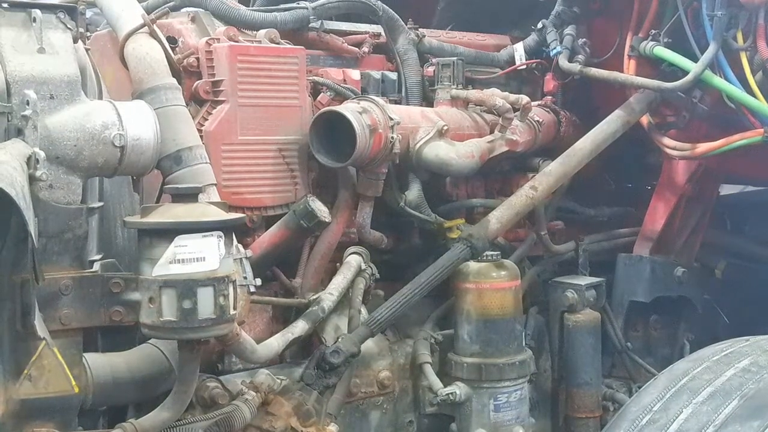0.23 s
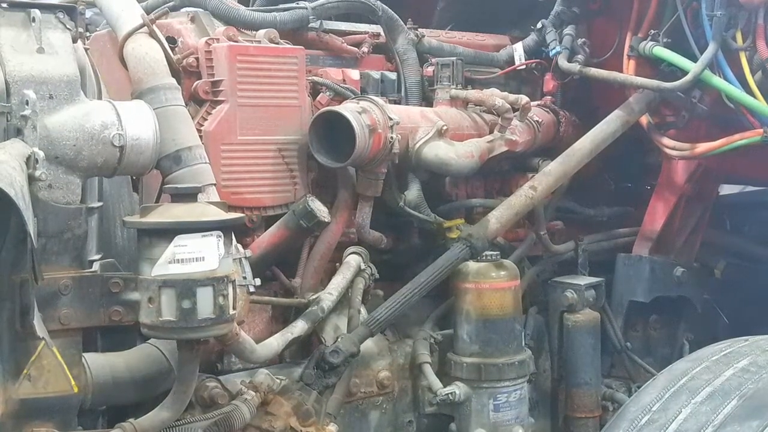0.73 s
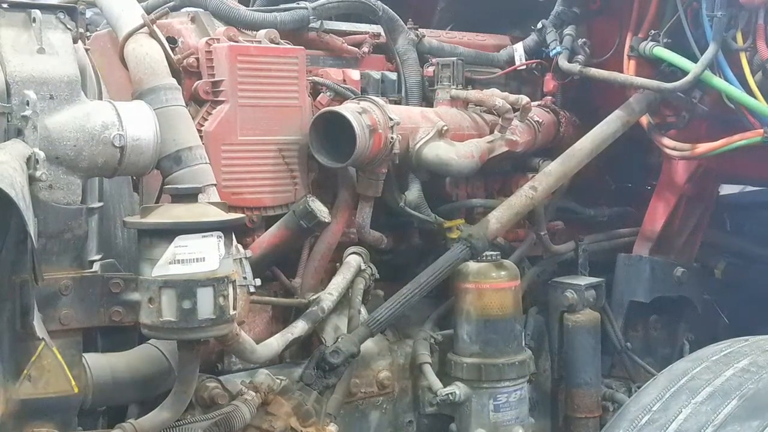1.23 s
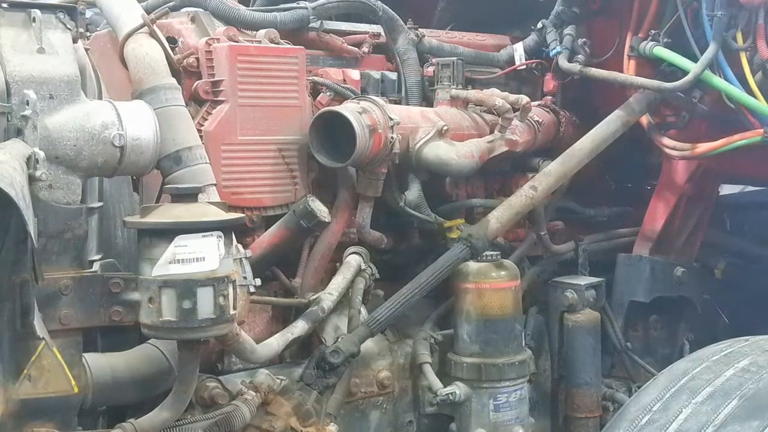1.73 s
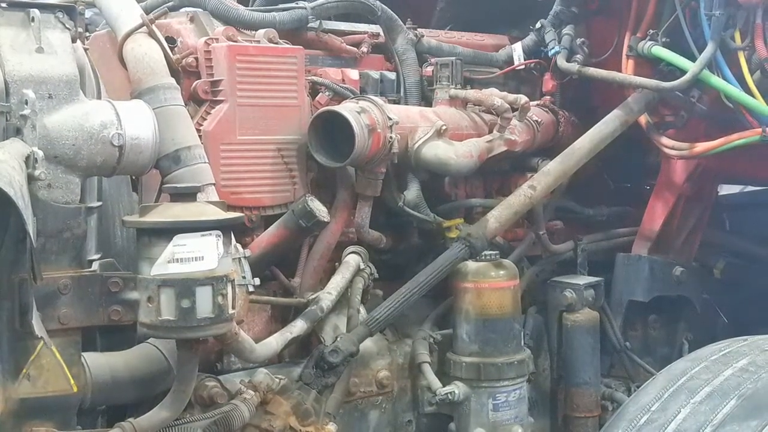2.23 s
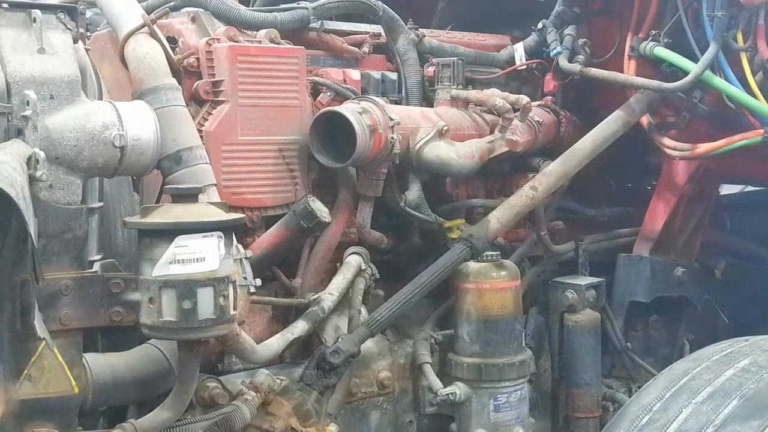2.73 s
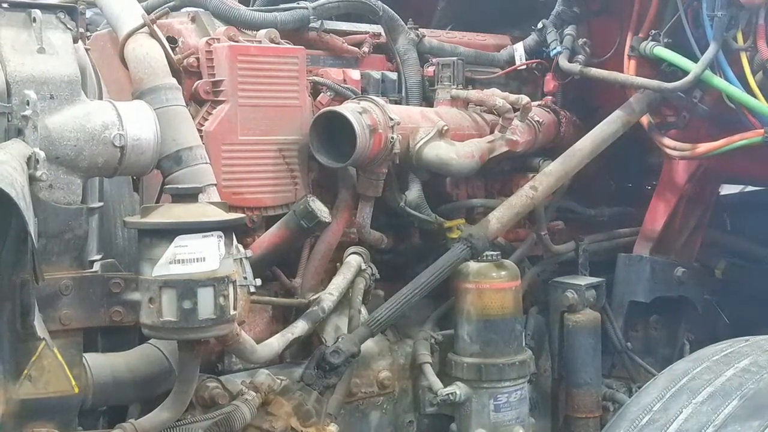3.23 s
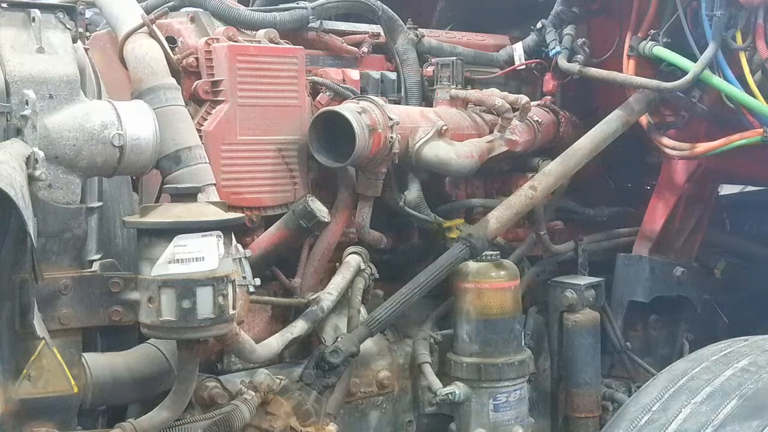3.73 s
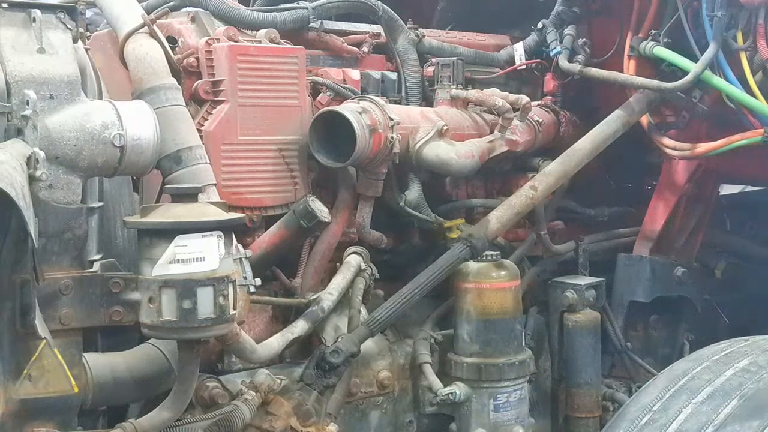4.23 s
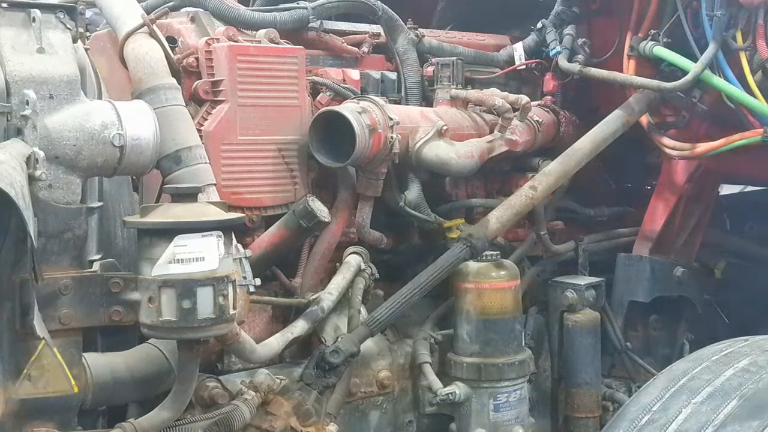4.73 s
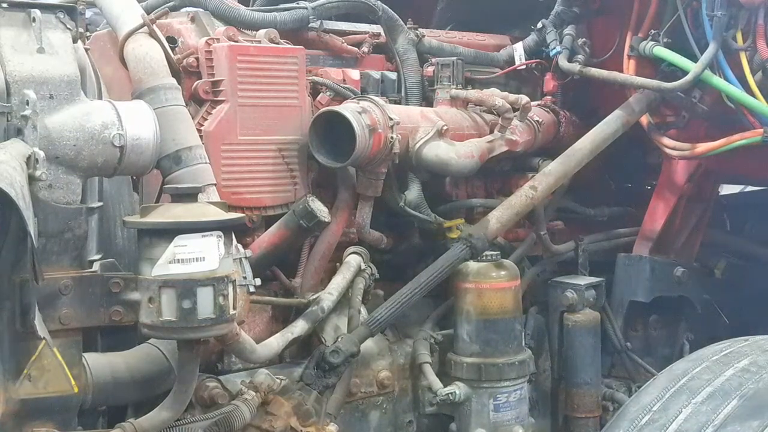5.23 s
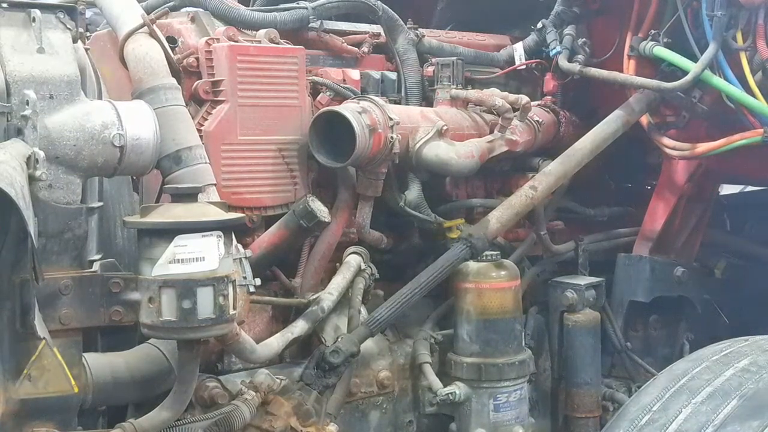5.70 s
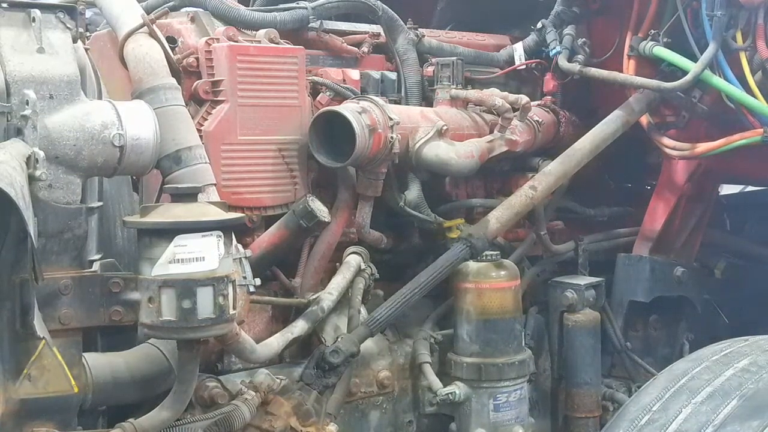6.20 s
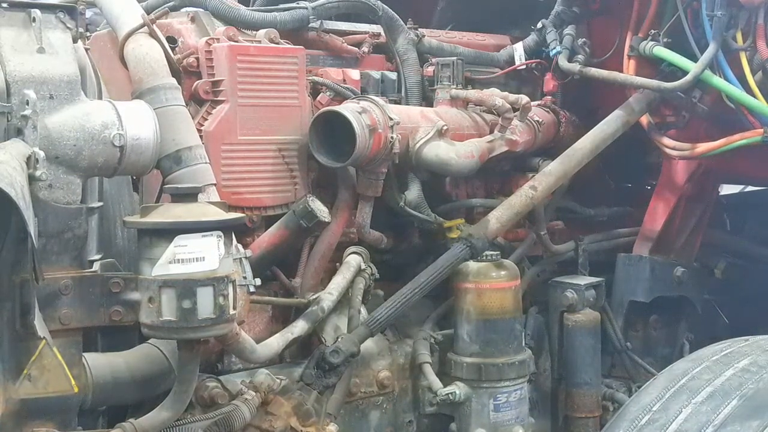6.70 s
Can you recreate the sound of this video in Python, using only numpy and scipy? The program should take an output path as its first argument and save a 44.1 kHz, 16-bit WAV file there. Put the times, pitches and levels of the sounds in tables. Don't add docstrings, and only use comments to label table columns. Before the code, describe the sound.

A big diesel engine roars at high revs up close, drops, blips once, coasts down, and settles into a lumpy, clattering idle.

```python
import sys
import numpy as np
from scipy import signal
from scipy.fft import rfft, irfft, next_fast_len
from scipy.io import wavfile
from scipy.ndimage import uniform_filter1d

SR = 44100
rng = np.random.default_rng(int(sys.argv[2]) if len(sys.argv) > 2 else 0)


def boost_factor(decibels):
    exponent = np.asarray(decibels, float) / 20
    return 10 ** exponent


def transcribe(u):
    v = np.clip(np.atleast_2d(u).T, -1, 1)
    q = np.round(v * 32767).astype(np.int16)
    wavfile.write(sys.argv[1], SR, q)


N = 306936


def evened(x):
    return x / np.sqrt(np.mean(x ** 2) + 1e-20)


def read(points, hz):
    f, value = np.transpose(points)
    return np.interp(np.log(hz + 1), np.log(f + 1), value)


def curves(rows):
    s, *columns = np.transpose(rows)
    return [np.interp(np.arange(N) / SR, s, c) for c in columns]


def colour(x, points):
    edge = 2048
    x = np.concatenate([x[..., edge:0:-1], x, x[..., :-edge - 1:-1]], axis=-1)
    size = next_fast_len(x.shape[-1])
    gain = boost_factor(read(points, np.fft.rfftfreq(size, 1 / SR)))
    return irfft(rfft(x, size) * gain, size)[..., edge:edge + N]


def resonate(x, hz, width):
    turn = np.exp(2j * np.pi * np.cumsum(hz * np.ones(len(x))) / SR)
    r = np.exp(-np.pi * width / SR)
    return 2 * (turn * signal.lfilter([1 - r], [1, -r], x / turn)).real


def resonate_twice(x, hz, width):
    return resonate(resonate(x, hz, width), hz, width)


def drift(hz, count):
    steps = rng.standard_normal((count, N // 256 + 2))
    steps = signal.filtfilt(*signal.butter(2, hz, fs=SR / 256), steps)
    return np.array([np.interp(np.arange(N) / 256, np.arange(len(s)), evened(s)) for s in steps])


# t/s, firing rate f/Hz
SPEED = [(0, 75.0), (.9, 75.2), (1.15, 67.2), (1.5, 57.0), (1.81, 48.7), (2.0, 62.5), (2.09, 72.0),
         (2.19, 77.9), (2.25, 76.7), (2.6, 64.8), (3.1, 51.2), (3.59, 39.7), (3.82, 34.0), (4.02, 32.5),
         (4.3, 32.5), (5.2, 30.9), (6.1, 30.4), (6.96, 30.1)]


def crank_speed():
    return curves(SPEED)[0]


STAGE_BLEND_S = .05
# from t/s, throb level/dB, its octave level/dB, fuel level/dB, knock depth [0-1],
# pipe notes level/dB
STAGES = [
    (0, -15, -22, 0.5, 0.15, 0),
    (.92, -14.5, -20, -0.5, .2, 1),
    (1.84, -12.5, -25, 0.5, .15, -7),
    (2.04, -29, -22, 1, 0.2, -6),
    (2.2, -14, -21, -0.5, .1, -1),
    (2.62, -13, -21, -0.5, .12, 0),
    (2.95, -13, -21, -0.5, .15, -1.5),
    (3.639, -19.5, -27, 0.7, .27, -1),
    (4.101, -18, -34.5, 1.3, 0.33, -1),
    (5.1, -17.2, -35, 0.5, 0.36, 0),
]


def pedal():
    s, *columns = np.transpose(STAGES)
    which = np.searchsorted(s, np.arange(N) / SR, side="right") - 1
    return [uniform_filter1d(c[np.maximum(which, 0)], size=round(STAGE_BLEND_S * SR)) for c in columns]


CRANK = [-26, -18, -40, -14, -21, -40, -13, -16, -9, -10, -11, -18, -13, -9, -18, -12, -14, -18, -18, -18,
         -14, -17, -13, -22, -20, -16, -20, -17, -17, -17, -16, -24, -24, -18, -16, -18]
# f/Hz, level/dB
PIPE = [(30, -14), (62, -10), (76, -1), (90, 4), (101, -9), (132, -7), (155, -15), (176, -7), (194, -14),
        (212, -1), (228, -1), (250, -2), (290, 1), (325, 2), (352, -3), (420, -12), (600, -2), (900, -10)]
# f/Hz, level/dB
OCTAVE_PIPE = [(70, 0), (92, 2), (103, -6), (116, -6), (128, 2), (140, 0), (150, -5)]


def exhaust(firings, hz, throb_db, octave_db, gas_db):
    wobble_db = 1.0 * drift(4.0, count=len(CRANK))
    out = boost_factor(throb_db - 0.5) * np.sqrt(2) * np.cos(2 * np.pi * firings)
    octave = np.cos(2 * np.pi * (2 * firings + 0.27))
    out += boost_factor(octave_db + read(OCTAVE_PIPE, 2 * hz)) * np.sqrt(2) * octave
    for k, db in enumerate(CRANK):
        order = (k + 1) / 3
        level = boost_factor(db + 4.8 + gas_db + read(PIPE, order * hz) + wobble_db[k])
        out += level * np.cos(2 * np.pi * (order * firings + rng.random()))
    return out


# t/s, length t/s, pipe note f/Hz, level/dB
BARKS = [
    (1.82, .3, 120, -14.5),
    (1.92, .32, 140, -15.5),
    (1.86, .32, 300, -16.5),
    (4.04, .2, 100, -21),
]


def barks(firings):
    which = firings.astype(int)
    pulses = boost_factor(3.0 * rng.standard_normal(1000)[which]) * np.diff(which, prepend=which[0])
    pulses = evened(pulses) + 1.5 * rng.standard_normal(N)
    out = np.zeros(N)
    for s, length, hz, db in BARKS:
        at, span = round(s * SR), round(length * SR)
        note = resonate_twice(pulses, hz, 70)[at:at + span]
        out[at:at + span] += boost_factor(db) * evened(note) * signal.windows.tukey(span, .5)
    return out


# f/Hz, level/dB
RUMBLE = [(15, -12.5), (45, -5), (70, -2), (95, 0), (125, 0.5), (165, -12.5), (230, -0.5), (310, -9.5),
          (400, -12.5), (520, -10), (800, -40.5)]


def rumble(beat, gas_db, firings, depth):
    lumps = 1 + .8 * depth * np.cos(2 * np.pi * (firings / 3 + .3))
    gas = lumps * (1.3 + 0.12 * beat) * rng.standard_normal(N)
    return boost_factor(.55 * gas_db - 11.5) * evened(colour(gas, RUMBLE))


CYLINDER_DB = [2, 1.5, -.8, 1.3, .8, -.8]


def knocks(firings, depth, lag=.45, sharp=2.3, uneven_db=.4):
    stroke = firings - lag + 6
    which = stroke.astype(int)
    size = boost_factor(np.take(CYLINDER_DB, which % 6) + uneven_db * rng.standard_normal(1000)[which])
    burst = uniform_filter1d(size * np.exp(-sharp * (stroke % 1)), size=220)
    depth = np.clip(depth, 0, 1)
    blows = depth * size * np.diff(which, prepend=which[0])
    beat = 1 - depth + depth * burst / burst.mean()
    return beat, blows


# f/Hz, level/dB
CLATTER = [(210, -29), (350, -10.5), (501, -6), (650, -5), (764, -0.5), (865, -3), (1250, -8.5), (1390, -8),
           (1730, -12.5), (2270, -19), (3510, -29.5), (4330, -25.5), (6770, -61), (8800, -94),
           (14900, -120)]
# f/Hz, width f/Hz, level/dB
BLOCK = [(606.8, 54.4, -11.5), (655.5, 60, -10), (870, 120, -16), (1011, 60, -20), (1107, 92, -20.5),
         (1383, 73, -37.5), (1892, 76, -33), (2065, 160, -28.5), (2298, 86, -31), (2640, 470, -32),
         (3080, 170, -35.5), (4100, 730, -51)]


def block(beat, blows):
    grit = rng.standard_normal(N)
    shake = beat ** 0.74 * grit
    struck = beat ** .5 * grit + 33.0 * blows
    flutter_db = .7 * drift(7.0, count=len(BLOCK))
    out = boost_factor(-4.5) * evened(colour(shake, CLATTER))
    for (hz, width, db), flutter in zip(BLOCK, flutter_db):
        ring = resonate_twice(struck, hz, 1.7 * width)
        out += boost_factor(db + flutter) * evened(ring * beat ** (hz / 2400))
    return out


# f/Hz, width f/Hz, level/dB
INJECTORS = [(2292, 90, -34), (1900, 130, -36), (2640, 160, -42), (3060, 200, -44), (1420, 120, -36)]


def ticks(blows):
    out = np.zeros(N)
    for hz, width, db in INJECTORS:
        struck = blows * boost_factor(2.0 * rng.standard_normal(N)) * rng.choice([-1, 1], N)
        out += boost_factor(db) * evened(resonate_twice(struck, hz, width))
    return out


# t/s, whistle f/Hz, level/dB over the iron noise
TURBO = [(0, 3700, 1), (.5, 3850, 3), (.95, 3900, 4.5), (1.25, 3780, 3), (1.5, 3470, 0), (1.9, 3280, 1),
         (2.1, 3450, -6), (2.4, 3700, -1.5), (2.65, 3620, -2), (2.9, 3380, 1), (3.2, 3200, 4),
         (3.55, 3020, 3), (3.85, 2680, 3), (4.05, 2500, 4), (4.25, 2320, 6), (4.8, 2250, 4),
         (6.96, 2200, -2)]
# f/Hz, level/dB
HISS = [(1800, -19), (3000, -5.5), (3800, 2), (4800, -5.5), (6000, -10), (8000, -37.5)]


def turbo(beat):
    hz, db = curves(TURBO)
    flicker, wander = drift(12.0, count=2)
    hz = hz * (1 + .006 * wander)
    air = beat ** 2 * rng.standard_normal(N)
    rush_db = -22.5 + 13.5 * np.log2(hz / 3500)
    rush = boost_factor(rush_db) * evened(colour(air / beat, HISS))
    whistle = evened(resonate_twice(air, hz, 330))
    return rush + boost_factor(db + 1.2 * flicker - 25.0) * whistle


# t/s, length t/s, level/dB, f/Hz
SINGS = [(0.096, 0.187, -14.5, 630), (0.384, 0.1, -19, 627), (0.494, 0.2, -12.5, 629),
         (0.903, 0.24, -19, 623), (1.384, 0.136, -20, 634), (1.552, 0.2, -18.5, 630),
         (1.925, 0.29, -16, 632), (2.337, 0.052, -17.5, 647), (2.444, 0.03, -15, 626),
         (2.611, 0.12, -17, 648), (2.795, 0.0874, -20, 660), (3.531, 0.044, -14, 640),
         (3.655, 0.045, -17, 640), (3.778, 0.076, -14, 644)]


def singing():
    out = np.zeros(N)
    for s, length, db, hz in SINGS:
        at, span = round(s * SR), round(length * SR)
        note = resonate_twice(rng.standard_normal(N // 8), hz, 45)[-span:]
        out[at:at + span] += boost_factor(db - 0.5) * evened(note) * signal.windows.tukey(span, .5)
    return out


# t/s, length t/s, from f/Hz, to f/Hz, level/dB
SQUEAKS = [
    (5.278, 0.1, 1388, 1430, -30.5),
    (6.1, 0.13, 509, 430, -22),
]


def squeaks():
    out = np.zeros(N)
    for s, length, from_hz, to_hz, db in SQUEAKS:
        hz = np.linspace(from_hz, to_hz, round(length * SR))
        at = round(s * SR)
        tone = np.sin(2 * np.pi * np.cumsum(hz) / SR)
        out[at:at + len(hz)] += 2 * boost_factor(db) * np.hanning(len(hz)) * tone
    return out


def scene():
    hz = crank_speed()
    throb_db, octave_db, fuel_db, depth, notes_db = pedal()
    octaves = np.log2(hz / 30.5)
    slew = uniform_filter1d(abs(np.gradient(hz)) * SR, size=round(STAGE_BLEND_S * SR))
    surge_db = .35 * drift(11.0, count=1)[0]
    block_db = -16.5 + 6.5 * octaves + fuel_db + surge_db
    gas_db = -25.5 + 14.5 * octaves + 0.14 * fuel_db - .05 * slew
    firings = .5 + np.cumsum(hz) / SR
    beat, blows = knocks(firings, depth)
    pipe = exhaust(firings, hz, throb_db, octave_db, gas_db + notes_db)
    pipe += rumble(beat, gas_db, firings, depth) + barks(firings)
    iron = boost_factor(block_db) * (block(beat, blows) + turbo(beat) + ticks(blows) * 2)
    return (pipe + iron + squeaks() + singing())[None]


def top_cut(x):
    return signal.sosfilt(signal.butter(12, 8400, fs=SR, output="sos"), x)


# f/Hz, level/dB
ROLL_OFF = [(3000, 0), (4000, 0), (5000, -4), (6000, -11.5), (6600, -20.5), (7100, -28), (7600, -67),
            (8300, -92.5)]


def record(dry):
    ceiling = .35
    dull = colour(np.clip(dry, -ceiling, ceiling), ROLL_OFF)
    return top_cut(dull)


dry = scene()
out = record(dry)
transcribe(out)
```